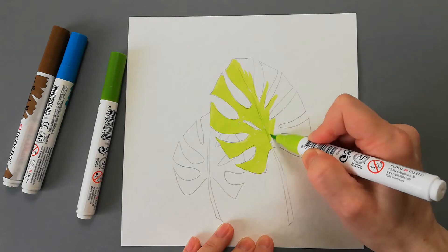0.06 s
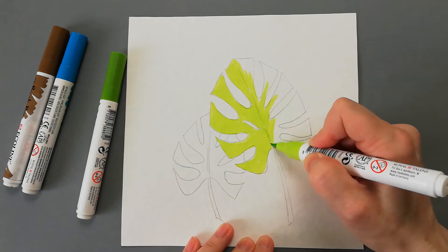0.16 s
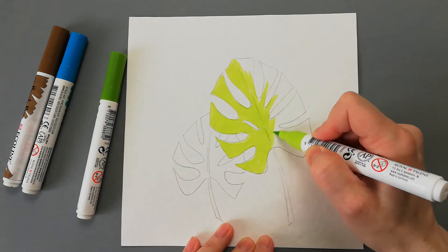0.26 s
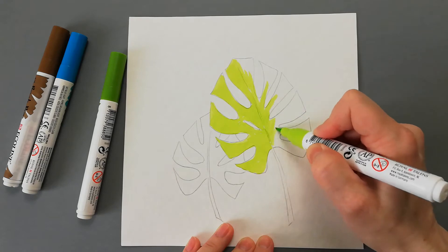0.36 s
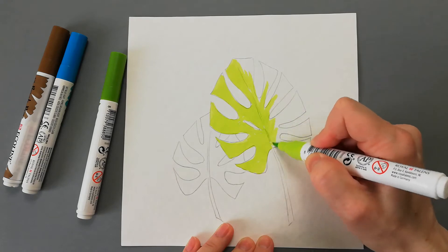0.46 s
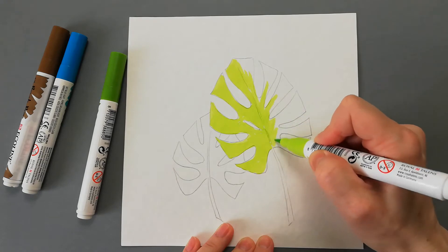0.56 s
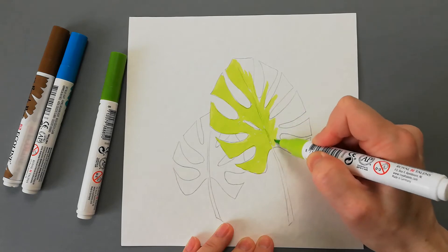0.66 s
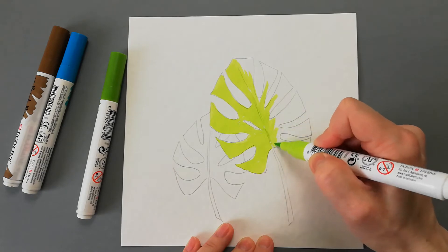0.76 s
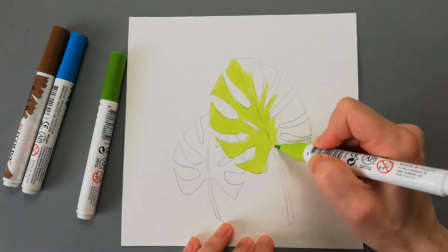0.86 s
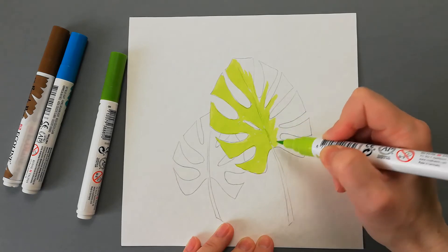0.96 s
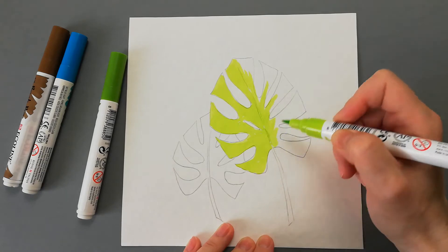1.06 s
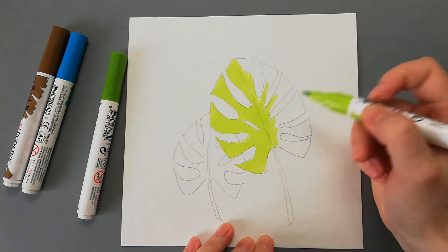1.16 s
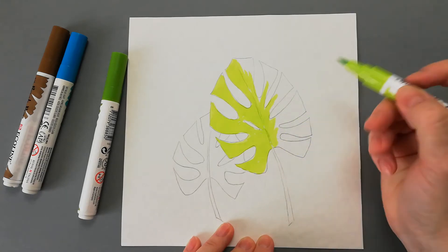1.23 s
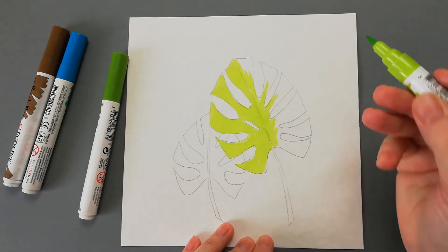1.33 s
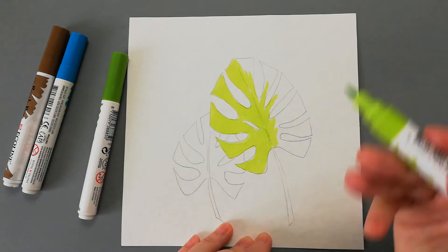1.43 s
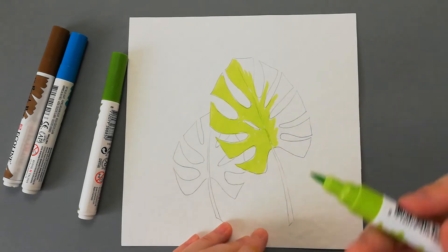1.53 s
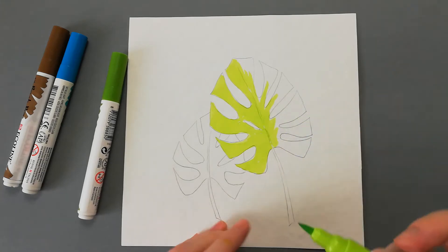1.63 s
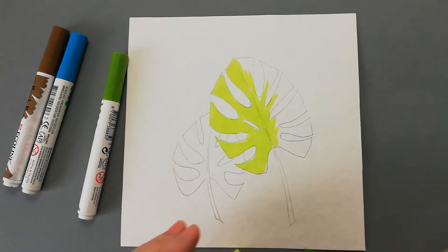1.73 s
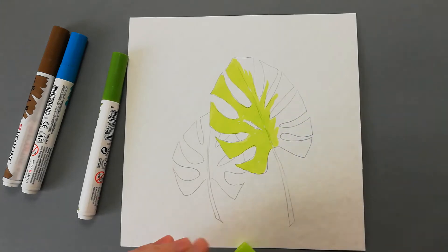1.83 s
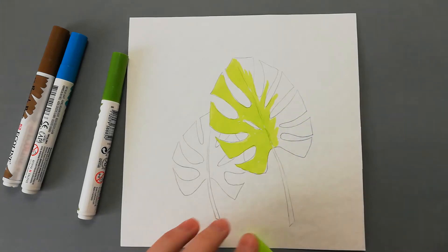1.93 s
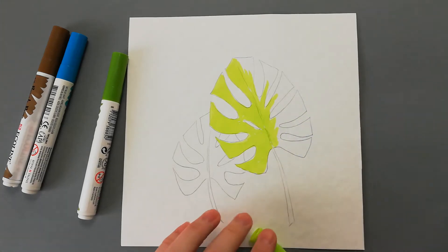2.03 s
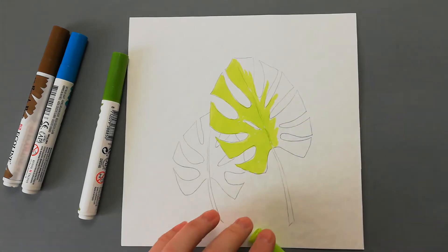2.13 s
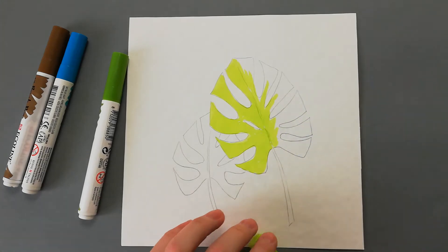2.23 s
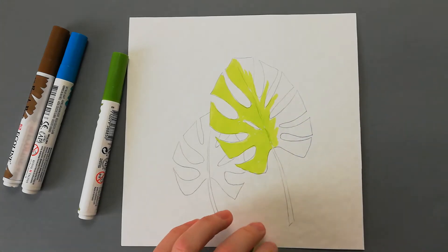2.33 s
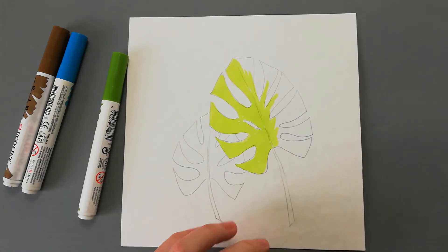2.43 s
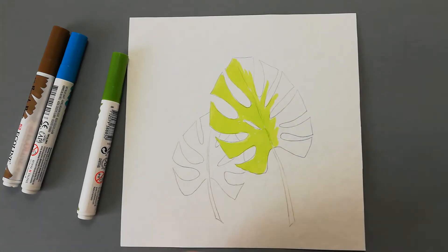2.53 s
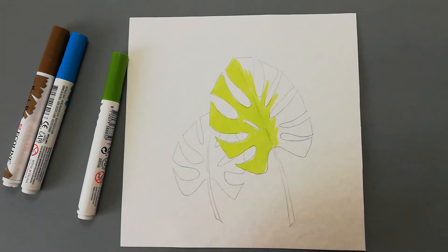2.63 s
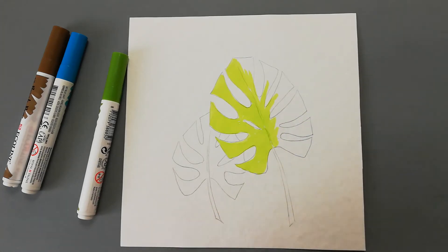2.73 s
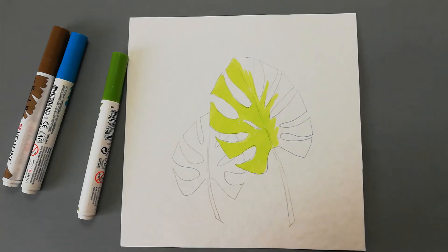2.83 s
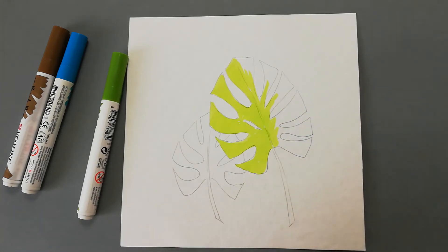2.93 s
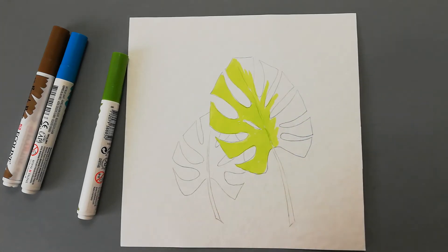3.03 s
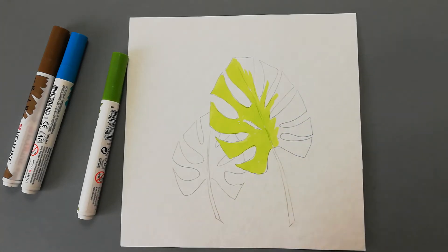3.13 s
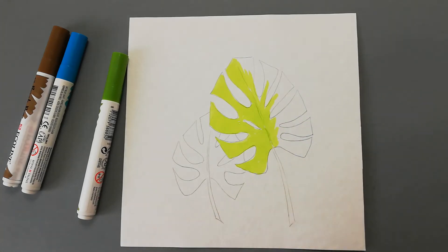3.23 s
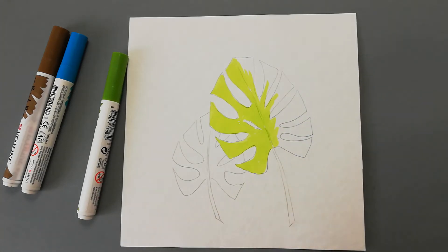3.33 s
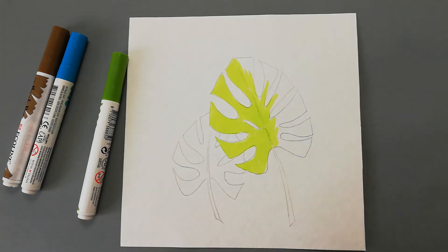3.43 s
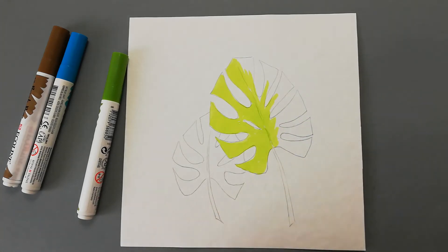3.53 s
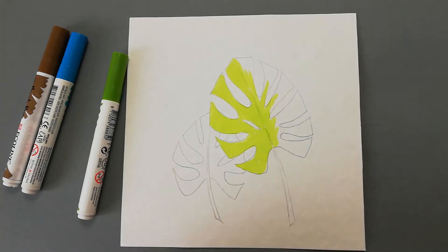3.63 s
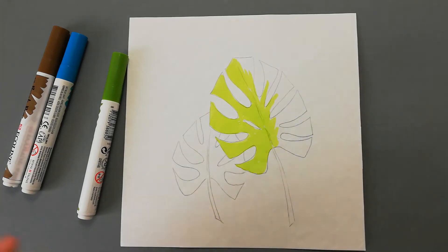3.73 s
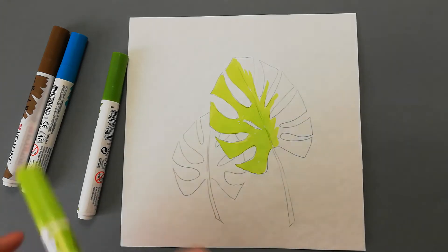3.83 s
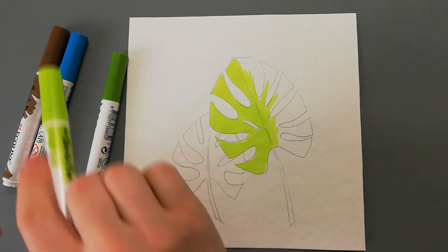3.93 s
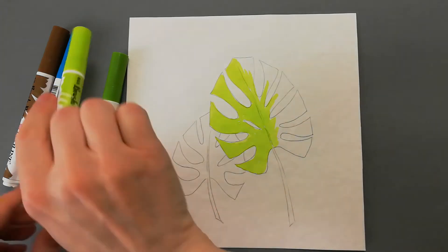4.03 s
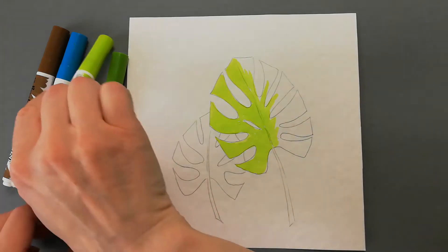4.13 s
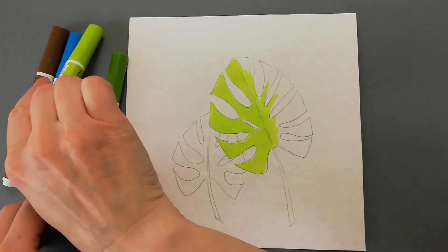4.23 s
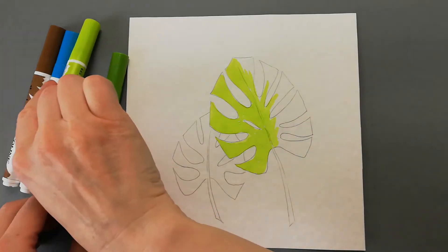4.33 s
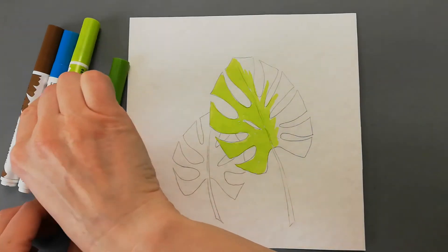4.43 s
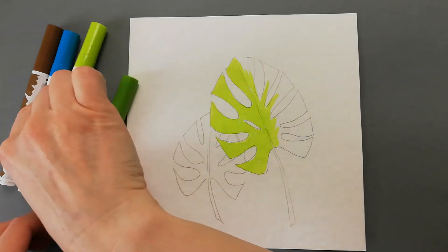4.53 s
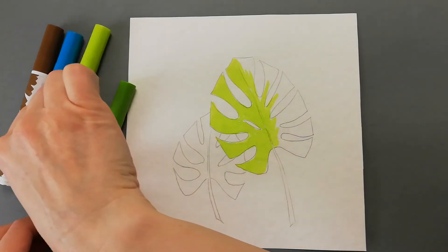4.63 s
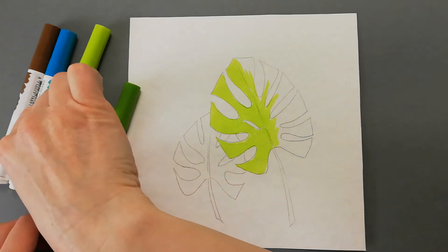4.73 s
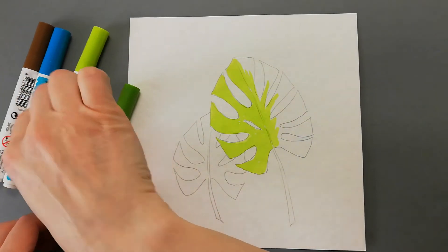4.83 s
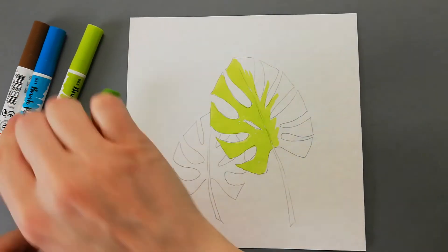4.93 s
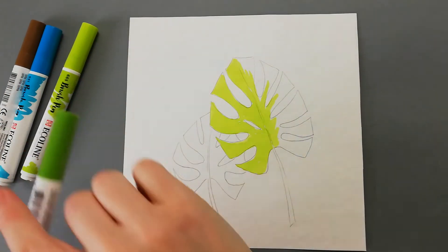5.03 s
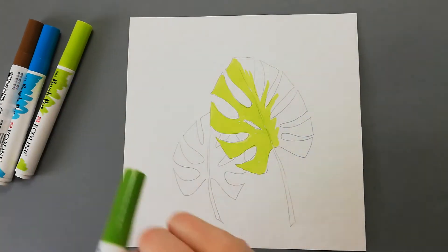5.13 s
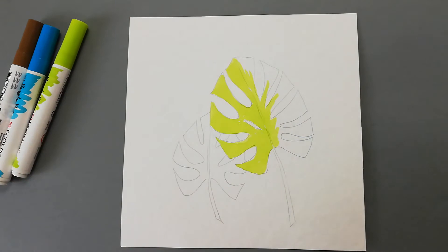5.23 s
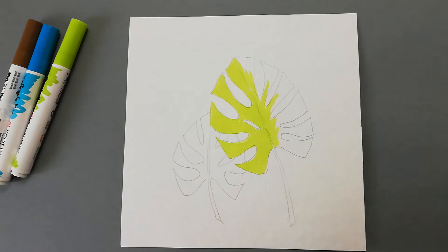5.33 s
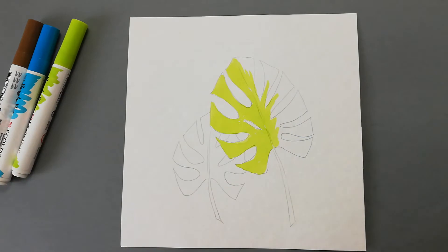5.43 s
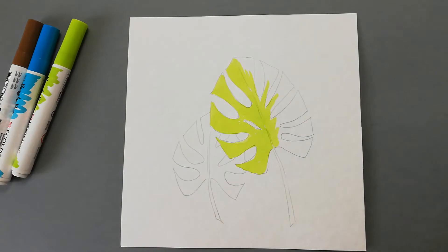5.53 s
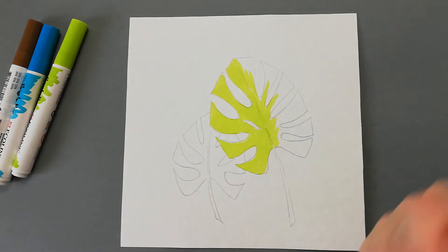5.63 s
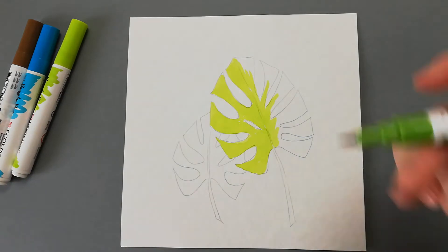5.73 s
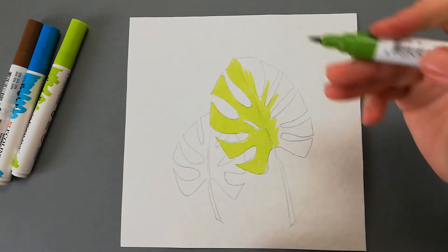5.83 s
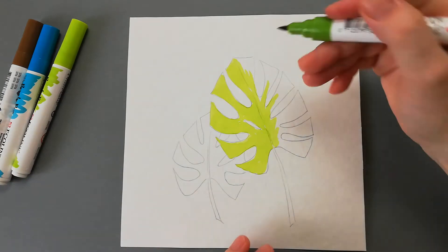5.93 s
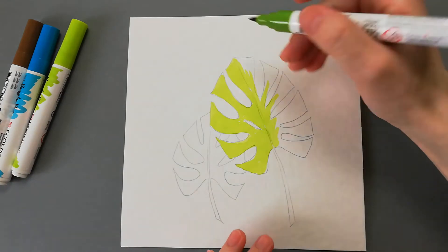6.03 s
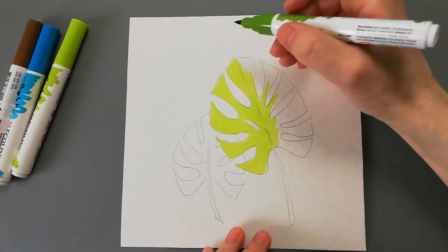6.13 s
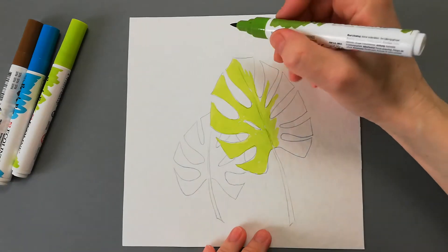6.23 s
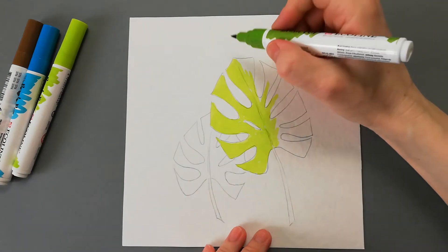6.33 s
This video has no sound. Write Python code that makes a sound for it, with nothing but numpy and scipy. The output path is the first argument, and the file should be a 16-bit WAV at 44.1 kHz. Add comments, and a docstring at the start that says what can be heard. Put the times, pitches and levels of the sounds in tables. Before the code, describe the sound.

Soft, squeaky-dry felt-tip strokes come first, followed by light skin rubs and a small click. After a near pause, a cap ticks and shuts with one hard, bright plastic snap. Hollow plastic barrels then knock on the desk with dull thumps, a second marker is uncapped with crisp clicks, and the hand settles softly on paper. Close stereo microphone, short indoor room response, low hiss.

```python
"""Short scratches come first: a brush-tip marker makes five strokes on rough paper, on a desk in a small room.
The hand slides away, a cap is slid on and snaps home, and the marker is knocked down among the others.
A second marker is then uncapped and the hand settles on the paper again, over a faint steady hiss.
Friction is random slips shaped by resonances or spectra; blows are decaying modes with bursts of noise.
A diffuse tail of decaying noise bands answers as the room."""
import sys
import numpy as np
from scipy import signal
from scipy.fft import rfft, irfft, next_fast_len
from scipy.io import wavfile

SR = 44100
rng = np.random.default_rng(int(sys.argv[2]) if len(sys.argv) > 2 else 0)


def to_wav(sig):
    """Store sig (one row per channel, or 1-D mono) as 16-bit WAV at the path in sys.argv[1].

    Samples outside -1..1 are clipped; the rate is SR.
    """
    pcm = np.clip(np.atleast_2d(sig), -1, 1) * 32767
    pcm = np.round(pcm).astype(np.int16)
    wavfile.write(sys.argv[1], SR, pcm.T)  # frames by channels


N = 280917
TIME = np.arange(N) / SR
RING_TIME = TIME[:SR // 2]   # common length of every blow and of the room tail

# Strokes of the nib. Each row: start, fastest moment and end in seconds, level in dB,
# barrel hum and top hiss in dB relative to the middle band.
NIB_STROKES = [(-.07, 0.145, .197, -57.5, 3.5, 0.5), (0.23, 0.251, .375, -55.5, -4, 6),
               (0.406, 0.516, 0.53, -53, -6, 0), (0.683, 0.748, 0.768, -55.5, -4.5, -4.5),
               (.873, 0.902, 0.933, -59.5, -6.5, -3)]
# Resonances of the dragged marker. Each row: frequency in Hz, width in Hz, relative level in dB.
NIB_RESONANCES = [(1005, 200, -6), (1355, 69, 3.5), (1410, 57, -1.5), (1564, 58, 3), (2580, 146, 1),
                  (3085, 100, 1), (3310, 170, 0), (3650, 230, 4), (4270, 104, 0.5), (4690, 130, -2.5),
                  (4970, 110, 0), (6380, 1350, -11.5), (9020, 240, -8), (10180, 520, -7)]
# Skin sliding on paper and plastic. Each row: start in seconds, length in seconds, level in dB,
# low swish in dB relative to the hiss.
SKIN_RUBS = [(1.086, 0.21, -64.5, 8), (1.222, 0.11, -62.5, -23), (1.25, 0.62, -74, 0),
             (2.008, 0.099, -60.5, 10), (4.203, 0.27, -69.5, 14), (4.455, 0.15, -55.5, -12.5),
             (4.746, 0.066, -58, 12), (5.363, 0.086, -67, -25), (5.693, .9, -73, -26)]
RUB_FASTEST_SHARE = .36   # a rub is fastest after this share of its length
# Spectrum of skin friction. Each row: frequency in Hz, relative level in dB per Hz.
SKIN_SPECTRUM = [(200, -21.5), (700, -11), (1400, -3.5), (2800, -3), (4000, -3.5), (5500, -5), (7500, -3),
                 (10500, 3.5), (12000, 1), (14000, -8), (16000, -16)]

# Spectrum of the cap scraping over the barrel. Each row: frequency in Hz, relative level in dB per Hz.
SCRAPE_SPECTRUM = [(300, -23), (1100, -12.5), (2200, -8), (2900, 3.5), (4000, -1.5), (5500, -3), (7500, 2),
                   (10000, -2.5), (12000, -3.5), (15000, -15)]
# The slide grows louder as the fit tightens, until the cap meets the catch.
SLIDE_START_S, SLIDE_STOP_S, SLIDE_END_DB = 2.264, 2.305, -37
SLIDE_TIGHTEN_DB_PER_S, SLIDE_ATTACK_DB_PER_S, SLIDE_RELEASE_DB_PER_S = 304, 850, 1102

# Clicks of the caps. Each row: time in seconds, level in dB, left-right difference in dB,
# pitch of the air in the cap in Hz, level of the air ring in dB.
CAP_CLICKS = [(1.185, -34, 2, 1650, -40.5), (2.021, -42, 0, 2070, -33.5), (3.0608, -38, -7, 3210, -27),
              (3.0762, -21.5, 1, 3360, -27.5), (3.1221, -16, -3.5, 2070, -32),
              (3.1846, -22, -10.5, 1900, -42), (3.2975, -4.5, 0, 3430, -37.5),
              (4.1522, -21.5, 3, 4420, -14.5), (4.272, -29, 6, 3430, -50), (4.319, -37.5, 4, 4200, -56),
              (4.624, -19, 6, 3700, -11.5), (5.5823, -18, 8.5, 2600, -30), (5.598, -21, 8, 2616, -34),
              (5.7401, -38, 7, 3570, -67), (6.2245, -42.5, -4, 2150, -36.5)]
# Modes of the thin cap wall. Each row: frequency in Hz, level in dB, 60 dB decay time in seconds.
CAP_MODES = [(2050, -35, 0.003), (2220, -29, 0.0033), (3300, -23, 0.0026), (4340, -14, 0.0042),
             (5900, -6.5, 0.0018), (6550, -15.5, 0.01), (7570, -5.5, 0.0018), (9780, 0.5, 0.0026),
             (10970, -5.5, 0.0078)]
# Spectrum of a hard plastic contact. Each row: frequency in Hz, relative level in dB per Hz.
SNAP_SPECTRUM = [(100, -30.5), (400, -17.5), (1000, -19.5), (1600, -5.5), (2500, 0.5), (4000, 0.5),
                 (6000, -4), (8000, 1), (10500, -0.5), (12500, 0.5), (15000, -10)]
# A stronger click is a harder contact, and so brighter: its cutoff doubles every so many dB.
HARDNESS_HZ_AT_0_DB, HARDNESS_DOUBLES_DB = 16502, 26
# Quick stick-slip runs of a tight cap. Each row: start in seconds, length in seconds, mean level in dB,
# left-right difference in dB.
STICK_SLIP_RUNS = [(3.069, .006, -32.5, 3), (3.104, .009, -37, -8), (3.1762, .009, -30, 8),
                   (5.602, .009, -25.5, 10)]
SLIP_GAP_S, SLIP_JITTER = .0033, .12   # jitter is a share of the gap
SLIP_AIR_HZ, SLIP_AIR_DB = 2600, -15.5   # air ring relative to the mean level of the run
# Air pops as a cap seals or unseals. Each row: time in seconds, level in dB, pitch in Hz.
AIR_POPS = [(3.2985, -37.5, 336), (5.5827, -34.5, 467)]

# Knocks of markers and hand on the desk. Each row: time in seconds, desk level in dB, desk contact cutoff in Hz,
# barrel level in dB, barrel contact cutoff in Hz, plastic tick level in dB.
DESK_KNOCKS = [(2.462, -55.5, 170, -70, 1800, -57), (4.1523, -23.5, 710, -17.5, 1767, -16),
               (4.6049, -41, 296, -32.5, 3570, -23), (4.6246, -28.5, 229, -15.5, 3550, -15.5),
               (4.843, -55.5, 118, -64, 1500, -41), (6.149, -48.5, 260, -42.5, 1050, -52),
               (6.224, -42, 220, -46, 3340, -39.5)]
# Modes of the desk top. Each row: frequency in Hz, level in dB, 60 dB decay time in seconds.
DESK_MODES = [(127.7, -9.5, 0.35), (211.5, -0.5, 0.11), (255.3, -12.5, 0.53), (392, -0.5, 0.12),
              (457, -7, 0.076), (545, -5.5, 0.19)]
# Modes of the barrel against the desk. Each row: frequency in Hz, level in dB, 60 dB decay time in seconds.
BARREL_MODES = [(599, -13, 0.061), (715, -11, 0.045), (890, -24, 0.02), (940, -28, 0.026),
                (1095, -14, 0.042), (1320, 0.5, 0.034), (1434, -21.5, 0.1), (1483, -7.5, 0.075),
                (1733, -6.5, .03), (1880, -6.5, 0.028), (2172, 0, 0.026), (2390, -11, 0.017),
                (2895, -26, 0.024), (3200, 9.5, 0.0032), (4430, 13.5, 0.0047), (4680, -9.5, 0.012)]
# Each knock bounces once: the desk gets nearly the same push, the plastic much less.
BOUNCE_S, BOUNCE_DESK_DB, BOUNCE_PLASTIC_DB = .0107, -5.5, -9
TICK_TOP_HZ = 11600   # the desk mat softens the tick of a knock above this
# Fingers and the heel of the hand landing. Each row: time in seconds, level in dB, pitch in Hz.
HAND_THUMPS = [(1.12, -51, 100), (1.712, -48, 131), (2.03, -47.5, 101), (2.07, -46, 195),
               (2.326, -45.5, 202), (4.1508, -33.5, 127), (4.624, -27.5, 134), (4.711, -41.5, 94.5),
               (4.764, -29, 147.1), (6.236, -36.5, 149)]
MODE_VARY_DB = 1.5   # random spread of each mode, and of each slip of a tight cap
PORT_LAG_S = .00055   # the desk modes reach the left port this much later

# Decay of the room. Each row: frequency in Hz, 60 dB decay time in seconds.
ROOM_DECAY = [(100, 1.26), (260, .5), (700, 0.5), (1800, 0.2967), (5000, 0.4033), (12000, 0.26)]
# Colour of the room. Each row: frequency in Hz, relative level returned in dB.
ROOM_RETURN = [(60, -14.5), (200, -6.5), (500, 3), (1200, 6), (3000, 1.5), (7000, -5), (11000, 3),
               (15000, -12)]
# Spectrum of still air and microphone hiss. Each row: frequency in Hz, relative level in dB per Hz.
AIR_SPECTRUM = [(12, -33.5), (20, -6), (22, -9), (53, -3.5), (79, -8.5), (210, -9.5), (293, -14.5),
                (347, -16), (377, -17), (590, -19), (802, -16.5), (976, -18), (6910, -22.5), (10200, -21.5),
                (16000, -24.5)]
AIR_DB = -64.5   # rms
# Coherence of a diffuse field at the two ports. Each row: frequency in Hz, left-right likeness from -1 to 1.
PORT_LIKENESS = [(60, 1), (130, 0.59), (290, -0.018), (640, -0.54), (1400, 0.42), (3100, 0), (15000, -0.17)]
CUTOFF_HZ = 16300


def nib():
    """Friction excitation: paper fibres pluck the felt tip and the barrel's resonances colour the scratch."""
    tooth = grains(per_s=9000, spread_db=1.5, shared=0.66) * judder(per_s=130, depth_db=1.1)
    scratch = 0
    for k, (hz, width_hz, db) in enumerate(NIB_RESONANCES):
        # the grip shifts, so each resonance swells and fades by itself
        swelling = resonate(tooth, hz, width_hz) * judder(per_s=18, depth_db=1.0)
        scratch = scratch + (-1) ** k * from_db(db) * swelling
    scratch = rms_one(scratch)
    hum = butter(scratch, 2000, "low", order=4)
    middle = butter(scratch, [2000, 6000], "band", order=4)
    top = butter(scratch, 4850, "high", order=4)
    out = np.zeros((2, N))
    for start, fastest, end, db, hum_db, top_db in NIB_STROKES:
        loudness = from_db(db) * sweep(start, fastest, end) ** 1.35
        out += loudness * (middle + from_db(hum_db) * hum + from_db(top_db) * top)
    return out


def skin():
    """Sliding friction: dry skin hisses, and the flat of the hand adds a lower swish."""
    slips_of_skin = grains(per_s=5000, spread_db=-2.0, shared=0.077)
    hiss = coloured(slips_of_skin, SKIN_SPECTRUM) * judder(per_s=44, depth_db=5.5)
    low, high = butter(hiss, 3500, "low"), butter(hiss, 2400, "high")
    out = np.zeros((2, N))
    for start, length, db, low_db in SKIN_RUBS:
        speed = sweep(start, start + RUB_FASTEST_SHARE * length, start + length)
        out += speed * from_db(db) * (from_db(low_db) * low - high)
    return out


def cap_slide():
    """Friction under rising normal force: plastic scrapes on plastic, harder as the fit tightens."""
    before, after = np.maximum(SLIDE_START_S - TIME, 0), np.maximum(TIME - SLIDE_STOP_S, 0)
    to_go = np.maximum(SLIDE_STOP_S - TIME, 0)
    level_db = SLIDE_END_DB - SLIDE_TIGHTEN_DB_PER_S * to_go
    level_db = level_db - SLIDE_ATTACK_DB_PER_S * before - SLIDE_RELEASE_DB_PER_S * after
    grip = judder(per_s=400, depth_db=1.8)
    scrape = coloured(grains(per_s=14000, spread_db=3.5, shared=0.36), SCRAPE_SPECTRUM)
    return from_db(level_db) * grip * scrape


def cap_clicks():
    """Impact on a shell and its cavity: wall and enclosed air ring; returns (near sound, spill into the room)."""
    near, spill = np.zeros((2, 2, N))
    for s, db, pan_db, air_hz, air_db in CAP_CLICKS + slips():
        pan = from_db([[pan_db / 2], [-pan_db / 2]])
        hard_hz = HARDNESS_HZ_AT_0_DB * 2 ** (db / HARDNESS_DOUBLES_DB)
        wall = ring(CAP_MODES, scatter_s=0.000096) + from_db(-12) * snap(t60=0.016)
        wall = from_db(db) * butter(wall, hard_hz, "low", order=1)
        air = from_db(air_db) * ring([(air_hz, 0, .009)], scatter_s=.0001)
        add(near, s, pan * butter(wall + air, 1200, "high"))
        wall_pulse = butter(pulse(2700, 13000), 2650, "high", order=4)
        wall_pulse = from_db(db - 0.5) * butter(wall_pulse, hard_hz, "low", order=1)
        air_pulse = from_db(air_db + 2.5) * pulse(air_hz / 1.25, air_hz * 1.25)
        add(spill, s, wall_pulse + air_pulse)
    return near, spill


def slips():
    """Stick-slip: a tight cap gives nearly evenly spaced ticks, returned as rows of cap clicks."""
    ticks = []
    for start, length, db, pan_db in STICK_SLIP_RUNS:
        for s in np.arange(start, start + length, SLIP_GAP_S):
            tick_s = s + SLIP_GAP_S * SLIP_JITTER * rng.standard_normal()
            tick_db = db + MODE_VARY_DB * rng.standard_normal()
            ticks.append((tick_s, tick_db, pan_db, SLIP_AIR_HZ, db + SLIP_AIR_DB))
    return ticks


def snap(t60):
    """Hard contact: plastic on plastic gives a bright crack of quickly decaying noise."""
    t = RING_TIME[:SR // 20]
    crack = coloured(rng.standard_normal((2, len(t))), SNAP_SPECTRUM)
    return padded(crack * from_db(-60 * t / t60))


def knocks():
    """Impact: desk, barrel and plastic ring, and soft contacts stay dull; returns (near sound, spill)."""
    near, spill = np.zeros((2, 2, N))
    for s, desk_db, desk_hz, barrel_db, barrel_hz, tick_db in DESK_KNOCKS + bounces():
        desk = ring(DESK_MODES, left_lag_s=PORT_LAG_S)
        desk = desk + from_db(10.5) * butter(burst(t60=0.32), [110, 600], "band")
        barrel = ring(BARREL_MODES, scatter_s=0.00056) + butter(burst(t60=0.058), [600, 3000], "band")
        tick = from_db(-7.5) * ring(CAP_MODES, scatter_s=0.000533) + from_db(-8.5) * snap(t60=0.033)
        desk_pulse = from_db(19.5) * pulse(175, 660)
        barrel_pulse = from_db(12.5) * pulse(630, 2450)
        tick_pulse = from_db(6.5) * pulse(3300, 11500)
        for out, low, middle, high in [(near, desk, barrel, tick),
                                       (spill, desk_pulse, barrel_pulse, tick_pulse)]:
            add(out, s, from_db(desk_db) * butter(low, desk_hz, "low", order=1))
            add(out, s, from_db(barrel_db) * butter(middle, barrel_hz, "low", order=3))
            add(out, s, from_db(tick_db) * butter(high, TICK_TOP_HZ, "low", order=4))
    return near, spill


def bounces():
    """Rebound: every knock strikes once more, a moment later and weaker."""
    return [(s + BOUNCE_S, desk_db + BOUNCE_DESK_DB, desk_hz,
             barrel_db + BOUNCE_PLASTIC_DB, barrel_hz, tick_db + BOUNCE_PLASTIC_DB)
            for s, desk_db, desk_hz, barrel_db, barrel_hz, tick_db in DESK_KNOCKS]


def burst(t60):
    """High modal density: the many short-lived modes of a struck body merge into decaying noise."""
    t = RING_TIME[:SR // 10]
    return padded(diffuse(size=len(t)) * from_db(-60 * t / t60))


def ring(modes, left_lag_s=0, scatter_s=0):
    """Modal superposition: one blow starts decaying sines, each with a fresh strength and path to each port."""
    out, size = 0, int(max(t60 for hz, db, t60 in modes) * SR) + 200
    for k, (hz, db, t60) in enumerate(modes):
        delay = scatter_s * rng.random((2, 1)) + [[left_lag_s], [0]]
        t = np.maximum(RING_TIME[:size] - delay, 0)
        strength_db = db + MODE_VARY_DB * rng.standard_normal()
        out = out + (-1) ** k * from_db(strength_db - 60 * t / t60) * np.sin(2 * np.pi * hz * t)
    return padded(out)


def thumps(events, cycles):
    """Heavy damping: a soft push decays by 60 dB within the given number of cycles."""
    out = np.zeros((2, N))
    for s, db, hz in events:
        add(out, s, from_db(db) * butter(ring([(hz, 0, cycles / hz)]), 2 * hz, "low"))
    return out


def pulse(low_hz, high_hz):
    """Radiated energy: the walls receive a blow, summed over directions, as a smooth pulse of unit energy."""
    x = butter(np.eye(1, len(RING_TIME)), [low_hz, high_hz], "band")
    return x / np.sqrt(np.sum(x ** 2))


def room(x, build_s):
    """Reverberation: wall reflections build up in a few milliseconds and die band by band."""
    noise, tail = diffuse(size=len(RING_TIME)), 0
    edges = np.geomspace(45, 18000, 14)
    for low, high in zip(edges, edges[1:]):
        hz = np.sqrt(low * high)
        decay = from_db(at_hz(ROOM_RETURN, hz) - 60 * RING_TIME / at_hz(ROOM_DECAY, hz))
        noise = noise[:, ::-1]   # time reversal makes neighbouring bands unrelated
        tail = tail + butter(noise, [low, high], "band") * decay
    tail = tail * (1 - np.exp(-(RING_TIME / build_s) ** 2))
    unit_tail = tail / np.sqrt(np.sum(tail ** 2) / 2)
    return signal.fftconvolve(x, unit_tail, axes=1)[:, :N]


def port_ring(sound):
    """Resonance: the microphone ports ring in the top octave, the left one more."""
    return from_db([[-3], [-16]]) * resonate(sound, 10200, 1500)


def air_hiss():
    """Stationary noise: still air and the microphone give a faint steady hiss."""
    return from_db(AIR_DB) * coloured(diffuse(size=N), AIR_SPECTRUM)


def diffuse(size):
    """Diffuse field: noise arrives from all sides, with a left-right likeness that depends on frequency."""
    length = next_fast_len(size)
    mid, side = rfft(rng.standard_normal((2, length)))
    hz = np.maximum(np.linspace(0, SR / 2, len(mid)), 1)
    alike = np.clip(at_hz(PORT_LIKENESS, hz), -1, 1)
    ports = np.sqrt((1 + alike) / 2) * mid + np.sqrt((1 - alike) / 2) * side * [[1], [-1]]
    return irfft(ports, length)[:, :size]


def grains(per_s, spread_db, shared):
    """Stochastic friction: tiny slips of uneven size, a share of whose power reaches both ports alike; rms 1."""
    born = rng.random((3, N)) < per_s / SR
    size = from_db(spread_db * np.minimum(rng.exponential(1, (3, N)), 4))
    slip = born * rng.standard_normal((3, N)) * size
    shared = np.clip(shared, 0, 1)
    return rms_one(np.sqrt(shared) * slip[2] + np.sqrt(1 - shared) * slip[:2])


def judder(per_s, depth_db):
    """Amplitude modulation: uneven grip is a random gain, interpolated between knots."""
    knots = rng.standard_normal(4000)
    return from_db(depth_db * np.interp(TIME * per_s, np.arange(len(knots)), knots))


def sweep(start, fastest, end):
    """Kinematics of a hand movement: its speed gathers, peaks at 1 and stops."""
    return np.sin(np.interp(TIME, np.sort([start, fastest, end]), [0, np.pi / 2, np.pi]))


def coloured(x, spectrum):
    """Spectral shaping: weight a texture by a spectrum; rms 1."""
    size = next_fast_len(x.shape[1])
    hz = np.maximum(np.fft.rfftfreq(size, 1 / SR), 1)
    shaped = irfft(rfft(x, size) * from_db(at_hz(spectrum, hz)), size)
    return rms_one(shaped[:, :x.shape[1]])


def resonate(x, hz, width_hz):
    """Simple resonator: two poles, with gain 1 on top."""
    r = np.exp(-np.pi * width_hz / SR)
    zeros = np.array([1, 0, -1]) * (1 - r * r) / 2
    poles = [1, -2 * r * np.cos(2 * np.pi * hz / SR), r * r]
    return signal.lfilter(zeros, poles, x + 1e-18)


def butter(x, hz, kind, order=2):
    """Maximally flat passband: a causal Butterworth filter."""
    sos = signal.butter(order, np.clip(hz, 10, .47 * SR), kind, fs=SR, output="sos")
    return signal.sosfilt(sos, x + 1e-18)


def from_db(db):
    """Logarithmic level: decibels to amplitude gain."""
    return 10 ** (np.asarray(db) / 20)


def rms_one(x):
    """Effective value: scale to unit rms."""
    return x / np.sqrt(np.mean(x ** 2) + 1e-20)


def at_hz(points, hz):
    """Logarithmic frequency: interpolate a table on a log-frequency axis."""
    points = np.array(points)
    return np.interp(np.log(hz), np.log(points[:, 0]), points[:, 1])


def add(out, s, sound):
    """Superposition: mix a sound in at s seconds."""
    start = int(s * SR)
    out[:, start:start + sound.shape[1]] += sound[:, :N - start]


def padded(x):
    """Common duration: follow a short stereo sound with silence, up to the ring length."""
    return np.pad(x, [(0, 0), (0, len(RING_TIME) - x.shape[1])])


def scene():
    """Superposition of direct and reverberant sound: hands and markers close by, the room, a steady hiss."""
    rubbing, slide = nib() + skin(), cap_slide()
    cap, cap_spill = cap_clicks()
    blows, blow_spill = knocks()
    soft = thumps(HAND_THUMPS, cycles=5.1) + thumps(AIR_POPS, cycles=2.3)
    spill = from_db(-9.5) * rubbing + from_db(-8.0) * slide + cap_spill + blow_spill
    spill = spill + from_db(-22) * blows + from_db(-6.5) * butter(soft, 170, "high")
    sound = rubbing + slide + cap + blows + soft + room(spill, build_s=0.0031)
    return sound + port_ring(sound) + air_hiss()


def record(dry):
    """Saturation and band limiting: the loudest peaks are rounded; the top rolls off and is then cut."""
    rounded = 1.2 * np.tanh(dry / 1.2)
    sound = butter(rounded, 14000, "low", order=3)
    return signal.sosfilt(signal.ellip(10, .2, 80, CUTOFF_HZ, fs=SR, output="sos"), sound)


dry = scene()
out = record(dry)
to_wav(out)
```